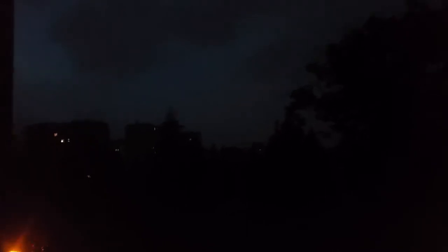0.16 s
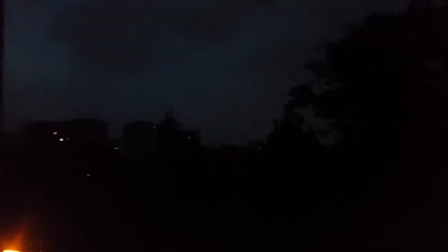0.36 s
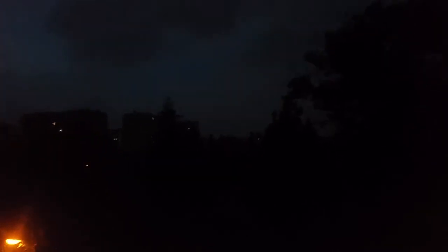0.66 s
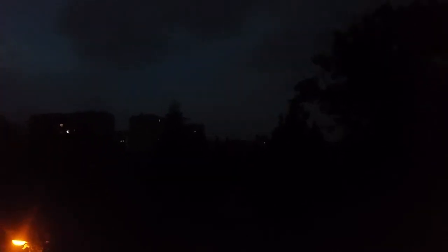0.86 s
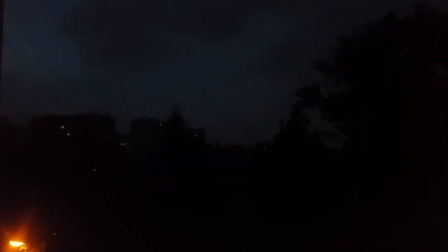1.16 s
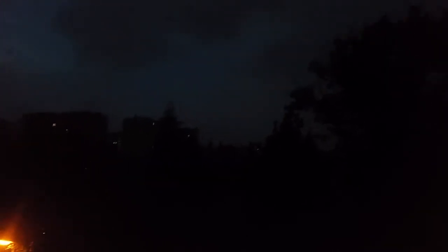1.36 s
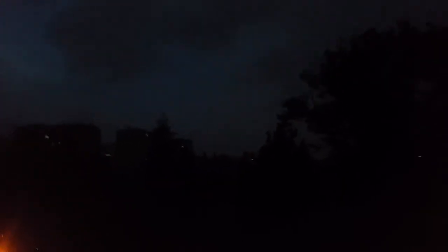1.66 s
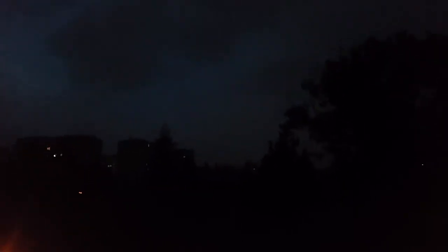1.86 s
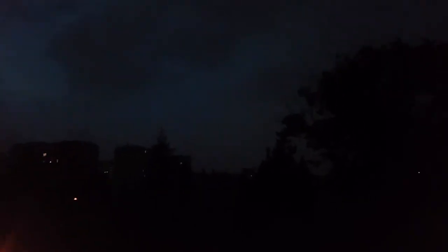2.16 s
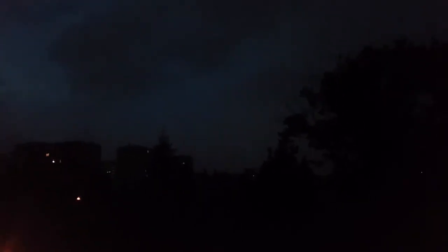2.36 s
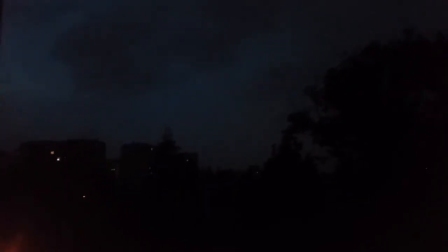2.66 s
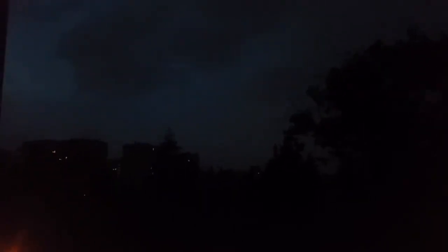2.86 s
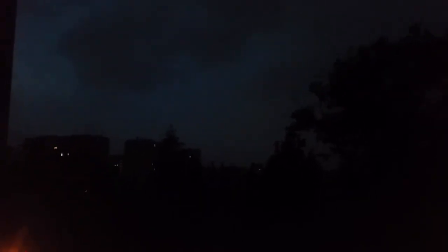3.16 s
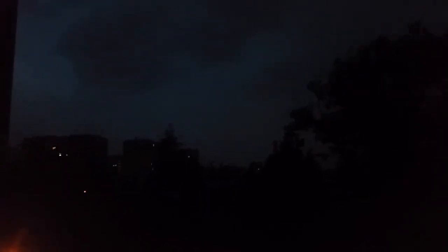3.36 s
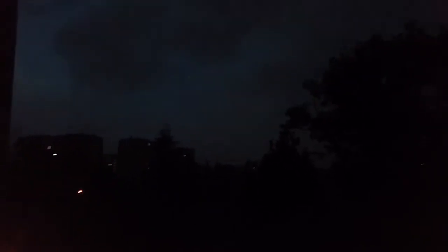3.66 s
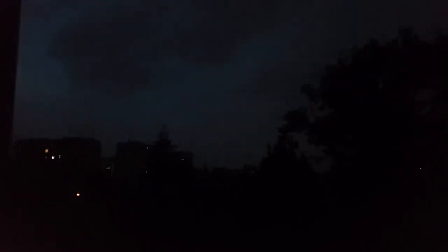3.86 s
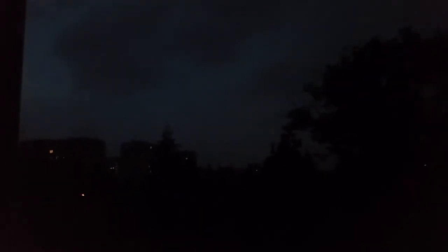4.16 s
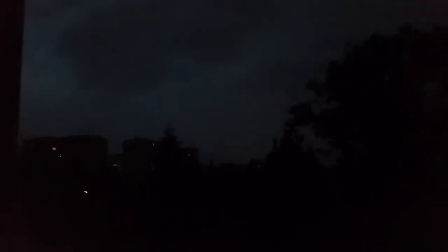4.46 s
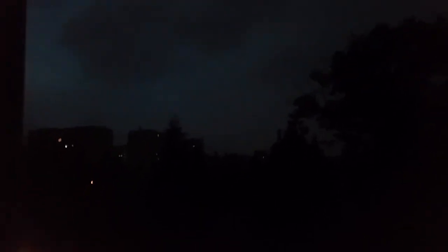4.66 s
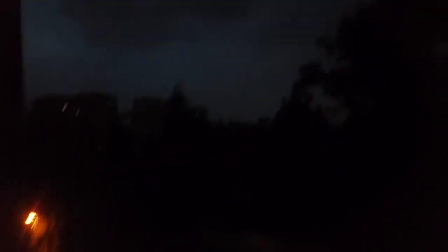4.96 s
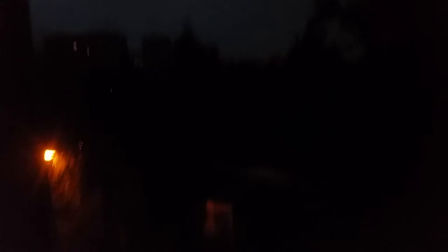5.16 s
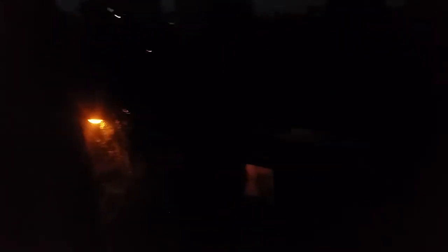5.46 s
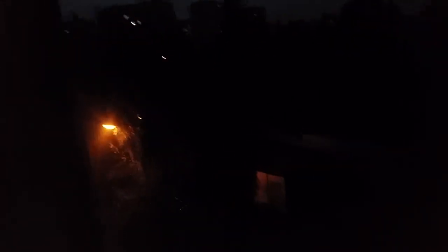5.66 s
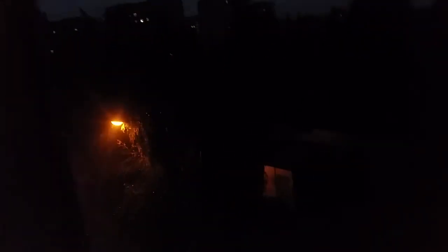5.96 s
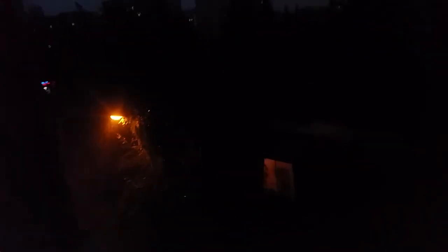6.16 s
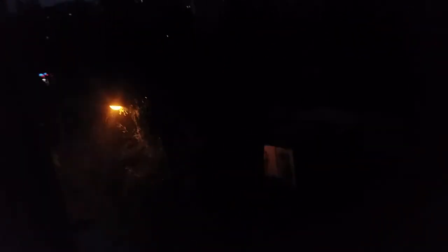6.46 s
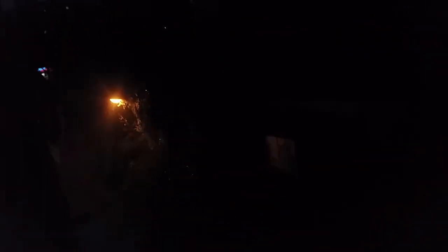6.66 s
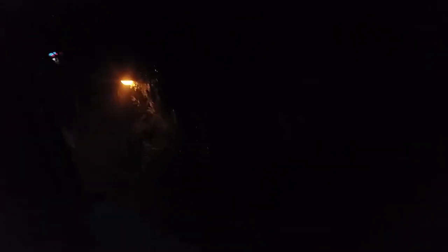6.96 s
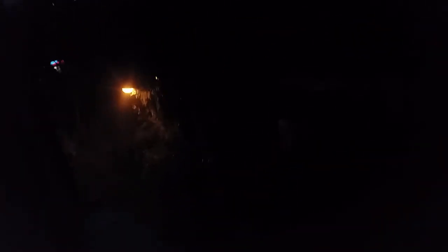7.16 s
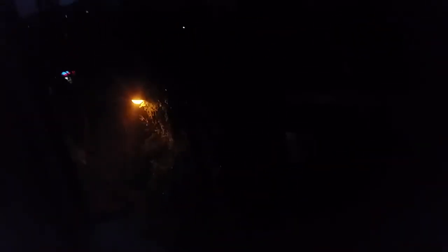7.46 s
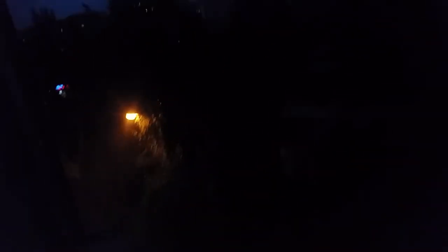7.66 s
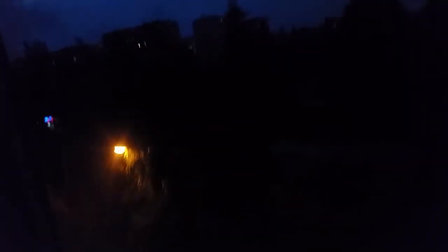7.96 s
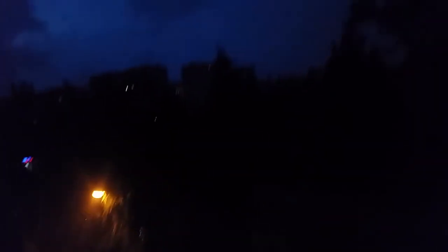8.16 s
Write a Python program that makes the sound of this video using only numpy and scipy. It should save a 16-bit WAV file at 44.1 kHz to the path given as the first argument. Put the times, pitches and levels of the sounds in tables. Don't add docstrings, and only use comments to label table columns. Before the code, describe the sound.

Heavy rain falls at night, heard from an open window. From 0 s a dense, continuous hiss and roar covers roofs and trees, wavering only slightly, with fine patter on top and a faint airy spray. Irregular single drops tick or dully tap the metal sill nearby, at about 0.4, 0.9, 1.2, 2.4, 2.9, 4.4 and several around 5.2 to 5.6 s. Below lies a soft low town rumble; muffled distant thunder mutters over it, growing somewhat from 3 to 6 s. At about 6.3 s near thunder begins, swelling strongly by 6.6 s into a deep, loud peal of crowded booms and rolling echoes, with heavy surges near 6.8, 7.3 and 7.6 to 7.7 s. The microphone's gain control ducks the rain markedly. The thunder eases after 7.8 s, then surges again as the sound stops at roughly 8.3 s.

```python
import sys
import numpy as np
from scipy import signal
from scipy.fft import rfft, irfft, next_fast_len
from scipy.io import wavfile
from scipy.ndimage import uniform_filter1d, minimum_filter1d

SR = 44100
rng = np.random.default_rng(int(sys.argv[2]) if len(sys.argv) > 2 else 0)


def wav_record(signal):
    frames = np.transpose(np.atleast_2d(signal))
    bounded = np.clip(frames, -1, 1)
    quanta = np.round(bounded * 32767).astype(np.int16)
    wavfile.write(sys.argv[1], SR, quanta)


def to_linear_factor(level_db):
    exponent = np.asarray(level_db, float) / 20
    return 10 ** exponent


N = 366471


def unit(x):
    return x / np.sqrt(np.mean(x ** 2) + 1e-20)


def along(points, hz):
    point_hz, value = np.transpose(points)
    return np.interp(np.log(hz + 1), np.log(point_hz + 1), value)


def curves(rows):
    time_s, *columns = np.transpose(rows)
    return [np.interp(np.arange(N) / SR, time_s, column) for column in columns]


def filtered(x, response):
    size = next_fast_len(N + SR // 2)
    spectrum = rfft(x, size) * response(np.fft.rfftfreq(size, 1 / SR))
    return irfft(spectrum, size)[..., :N]


def coloured(x, spectrum):
    return unit(filtered(x, lambda hz: to_linear_factor(along(spectrum, hz))))


def evened(x, seconds):
    slow_power = uniform_filter1d(x ** 2, round(seconds * SR))
    return unit(x / np.sqrt(np.abs(slow_power) + .05))


def impacts(spread_db, count):
    when, sign, size = rng.random((count, 3)).T
    gains = np.sign(sign - .5) * to_linear_factor(-spread_db * np.log(size + 1e-6))
    return unit(np.bincount((when * N).astype(int), gains, N))


def patchy(patchy_db):
    cells = signal.stft(rng.standard_normal(N), nperseg=512)[2]
    field = uniform_filter1d(rng.standard_normal(cells.shape), 6, 0)
    field = uniform_filter1d(field, 14, 1)
    return signal.istft(cells * to_linear_factor(patchy_db * unit(field)), nperseg=512)[1][:N]


# start_s, trees_db, near_roofs_db
RAIN_STRENGTH = [(0, 0, 0.5), (.8, -0.5, 2), (1.3, 1, 1), (2.2, 1, 1.5), (2.7, 0, 0.5), (3.3, -.5, -0.5),
                 (3.7, -0.5, 0), (4.1, 2, -2), (4.5, -1.5, -1), (4.9, -0.5, 1), (5.3, 0, 0), (6.0, .5, -1),
                 (8.3, -1.5, -1)]
# pitch_hz, level_db [dB per Hz]
ROAR_COLOUR = [(280, -39), (470, -11), (512, -4), (561, -5), (644, -2.5), (782, -4), (950, -7), (1240, -35),
               (2090, -120)]
WASH_COLOUR = [(520, -32.5), (880, -4), (1110, -0.5), (1200, -2.5), (1320, -0.5), (1900, -11.5),
               (2470, -35), (4180, -120)]
PATTER_COLOUR = [(1300, -15.5), (1800, -0.5), (2600, -3.5), (3900, -11), (5500, -18.5), (6900, -25),
                 (7500, -31.5), (8200, -39), (8800, -49.5), (11000, -85)]
SPRAY_COLOUR = [(7000, -26), (8700, -9.5), (9800, -5), (10800, -1.5), (11900, 0), (13000, -2), (14500, -4),
                (15700, -4.5)]


def rain():
    trees_db, roofs_db = curves(RAIN_STRENGTH)
    duck_db = ducking()
    near_drops = impacts(spread_db=2, count=12000)

    roar = evened(coloured(patchy(patchy_db=1.1), ROAR_COLOUR), .3)
    roar = roar * to_linear_factor(-29 + roofs_db - 0.54 * duck_db)

    wash = evened(coloured(patchy(patchy_db=0.7), WASH_COLOUR), 0.37)
    wash = wash * to_linear_factor(-30 + trees_db - 0.87 * duck_db)

    patter = coloured(patchy(patchy_db=0.82) + 0.25 * near_drops, PATTER_COLOUR)
    patter = evened(patter, 0.58) * to_linear_factor(-34.5 + 0.47 * trees_db - 0.91 * duck_db)

    spray = coloured(rng.standard_normal(N) + .45 * near_drops, SPRAY_COLOUR)
    smooth_duck_db = uniform_filter1d(duck_db, size=SR // 12)
    spray = spray * to_linear_factor(-57 + .8 * roofs_db - 1.9 * smooth_duck_db)
    return roar + wash + patter + spray


def rolls(rows, rise_s, fall_db_s):
    t, power = np.arange(0, N, 64) / SR, 1e-9
    spill_db = 6.5
    for start_s, level_db, octaves in rows:
        rise = np.exp(-((t - start_s) / rise_s) ** 2)
        fall = to_linear_factor(-2 * fall_db_s * np.abs(t - start_s))
        shape = np.where(t < start_s, rise, fall)
        layer_db = level_db - spill_db * (octaves - np.arange(-1, 2)) ** 2
        power = power + np.outer(to_linear_factor(2 * layer_db), shape)
    return np.array([np.interp(np.arange(N) / SR, t, layer) for layer in power])


def shock_fronts(colour, smooth_s):
    return evened(coloured(impacts(spread_db=2.0, count=12000), colour), smooth_s)


# start_s, level_db, pitch_octaves above the middle layer
GROWLS = [(.7, -34.5, 0.51), (1.12, -39, -0.99), (1.5, -39, .1), (2.25, -39, -0.19), (2.95, -33, -0.26),
          (3.35, -31, -0.088), (3.85, -36, -0.46), (4.25, -32, -0.44), (4.7, -30.5, -0.26),
          (5.05, -29.5, -.3), (5.25, -32, 0.46), (5.5, -29.5, -0.086), (5.85, -33.5, 0.061),
          (6.12, -31.5, 0.11)]
TOWN_LEVELS = [-44.5, -37, -35.5]
# pitch_hz, level_db [dB per Hz]
DEEP_COLOUR = [(24, -43), (40, -16.5), (56, -7), (80, -5.5), (120, -5.5), (160, -34.5), (260, -120)]
UPPER_COLOUR = [(62, -32.5), (105, -10.5), (119, -3), (162, -1), (215, -4.5), (238, -12), (255, -10),
                (330, -35), (560, -120)]
DRONE_COLOUR = [(140, -29.5), (240, -5), (269, -0.5), (312, -4), (381, -2.5), (421, -5.5), (490, -6),
                (640, -27.5), (1080, -120)]


def distant_rumble():
    growl_power = rolls(GROWLS, rise_s=0.11, fall_db_s=28.5)
    gains = np.sqrt(growl_power + to_linear_factor(TOWN_LEVELS)[:, None] ** 2)
    colours = (DEEP_COLOUR, UPPER_COLOUR, DRONE_COLOUR)
    far = sum(gain * shock_fronts(colour, 0.19) for gain, colour in zip(gains, colours))
    return far * to_linear_factor(-ducking())


# start_s, tick_db, ring_db, body_db
SILL_DROPS = [(0.3606, -31.5, -40, -33), (0.8619, -47.5, -42, -33), (1.1428, -41.5, -45, -31),
              (1.2281, -42, -48, -30), (1.6894, -44, -45, -29), (2.3965, -38.5, -38.5, -31),
              (2.6399, -48.5, -49, -34), (2.9274, -50, -46, -19), (2.9436, -41, -46, -31),
              (3.3328, -40.5, -47, -29), (4.3355, -46, -50, -33), (4.3874, -46, -33, -33),
              (4.5555, -41.5, -42, -32), (4.9387, -49.5, -39, -29), (5.2056, -45, -50, -33),
              (5.3722, -35, -37, -31), (5.3894, -39, -45, -32), (5.4394, -48, -49, -32),
              (5.62, -46.5, -44, -23), (7.1676, -49.5, -49, -37)]


def sill():
    layers, t = np.zeros((3, N + SR)), np.arange(SR // 25) / SR
    hit = to_linear_factor(-60 * t / 0.0071) * (1 - np.exp(-t / 0.00033))
    splash = to_linear_factor(-9 - 60 * t / 0.079)
    for start_s, *levels_db in SILL_DROPS:
        levels = to_linear_factor(np.array(levels_db) + [3, 6, 3])
        drop = levels[:, None] * (hit + splash) * rng.standard_normal(len(t))
        layers[:, round(start_s * SR):][:, :len(t)] += drop

    centre_hz = np.array([[12500], [6500], [3500]])
    width_hz = np.array([[3600], [2000], [1500]])

    def response(hz):
        band = np.exp(-((hz - centre_hz) / width_hz) ** 2)
        microphone_dip = 1 - .75 * np.exp(-((hz - 8700) / 900) ** 2)
        return band * microphone_dip

    return filtered(layers[:, :N], response).sum(0)


# start_s, level_db before the gain control, pitch_octaves above the middle layer
CLAPS = [(6.29, -19, .8), (6.34, -13.5, -0.15), (6.43, -11.5, 0.33), (6.51, -12, 0.22),
         (6.59, -14.5, -0.71), (6.625, -4, 0.13), (6.69, -5, -0.35), (6.76, -8.5, 0.1), (6.815, -1.5, 0.04),
         (6.87, -2, 0.22), (7.0, -3, -0.047), (7.08, -6.5, -0.2), (7.15, -8, .9), (7.18, -3.5, -0.74),
         (7.26, -5, .3), (7.33, 2.5, -.6), (7.335, 0, .9), (7.38, -0.5, -0.2), (7.46, -2, 0.29),
         (7.55, -0.3, -0.59), (7.62, -2.5, .8), (7.64, 5.5, -0.76), (7.7, 3, 0.16), (7.8, -14, -0.57),
         (7.86, -3.5, 0.95), (7.99, -6, -0.021), (8.08, -11.5, 0.47), (8.16, -12, .3), (8.23, -6.5, 0.21),
         (8.28, -0.5, -0.1)]


def clap_power():
    return rolls(CLAPS, rise_s=.022, fall_db_s=75)


# pitch_hz, level_db [dB per Hz]
BOOM_COLOUR = [(24, -48.5), (40, -15), (72, 4.5), (120, 4), (160, -24), (260, -120)]
ROLL_COLOUR = [(62, -19), (105, 2.5), (129, -0.5), (178, 3), (245, -10.5), (320, -33), (540, -120)]
RATTLE_COLOUR = [(140, -29), (230, -1.5), (391, -6), (489, -13.5), (600, -22), (750, -26), (950, -28.5),
                 (1300, -55.5), (1980, -120)]


def peal():
    layer_db = [-0.8, -1, -5]
    gains = np.sqrt(clap_power()) * to_linear_factor(layer_db)[:, None]
    colours = (BOOM_COLOUR, ROLL_COLOUR, RATTLE_COLOUR)
    near = sum(gain * shock_fronts(colour, .06) for gain, colour in zip(gains, colours))
    return near * to_linear_factor(-ducking())


def ducking():
    knee_db, release_db_s, memory_s = -12, 30, 0.57
    over_db = np.maximum(10 * np.log10(clap_power().sum(0)) - knee_db, 0)
    ramp = release_db_s * np.arange(N) / SR
    fast_db = np.maximum.accumulate(0.42 * over_db + ramp) - ramp
    keep = np.exp(-1 / (memory_s * SR))
    slow_db = 0.47 * signal.lfilter([1 - keep], [1, -keep], over_db)
    return fast_db + slow_db


# pitch_hz, width_hz, level_db
RECESS_TONES = [(135, 9.4, 3.5), (306, 49, 1.5), (352, 14, 3.5), (630, 24, 3), (1116, 39, 2)]


def window_recess(outside):
    def response(hz):
        lift_db = sum(db / (1 + ((hz - centre) / (width / 2)) ** 2) for centre, width, db in RECESS_TONES)
        return to_linear_factor(lift_db + 0.38)

    return filtered(outside, response)


def scene():
    outside = rain() + distant_rumble() + peal()
    return np.tile(window_recess(outside) + sill(), (2, 1))


def limiter(x):
    bass = filtered(x, lambda hz: 1 / (1 + (hz / 600) ** 6))
    need = np.minimum(1, .88 / (np.abs(bass).max(0) + 1e-9))
    gain = uniform_filter1d(minimum_filter1d(need, size=900), size=800)
    return x - bass + bass * gain


# pitch_hz, left_minus_right_db
CHANNEL_LEAN = [(600, -.16), (1400, -.75), (2000, -.4), (3000, -3), (4000, -6.2), (5500, -10), (6600, -7.8),
                (7500, -5.3), (7650, -1.5), (9500, 0), (9700, 3.2), (11000, 3.8), (12300, 3.4), (12500, 0)]


def leaned(x):
    def response(hz):
        share = 2 / (1 + to_linear_factor(np.outer([-1, 1], along(CHANNEL_LEAN, hz))))
        return share * (hz < 15740)

    return filtered(x, response)


def band_limit(x):
    return signal.sosfilt(signal.butter(12, 15760, fs=SR, output="sos"), x)


def record(dry):
    bass_cut = filtered(dry, lambda hz: 1 / np.sqrt(1 + (49 / (hz + 1)) ** 8))
    mix = leaned(limiter(bass_cut))
    return band_limit(mix)


dry = scene()
out = record(dry)
wav_record(out)
```